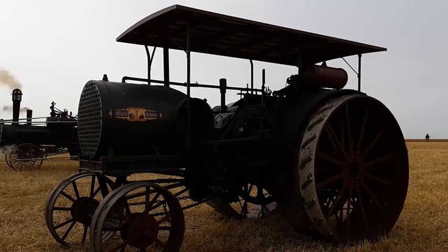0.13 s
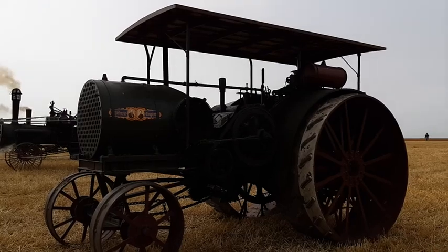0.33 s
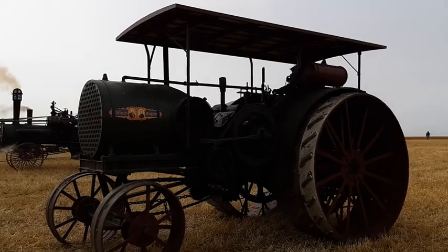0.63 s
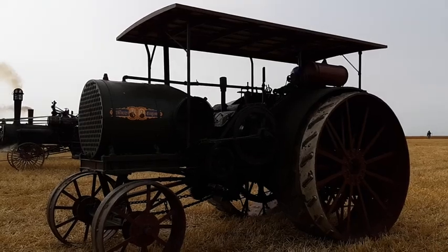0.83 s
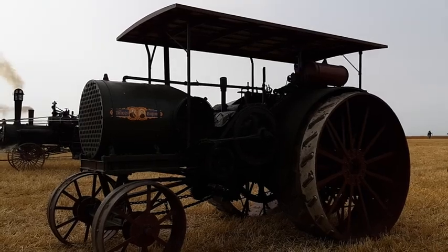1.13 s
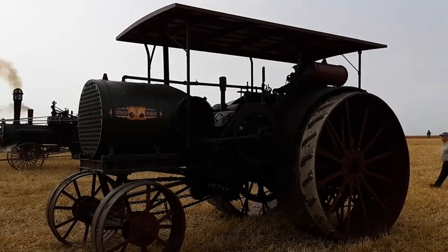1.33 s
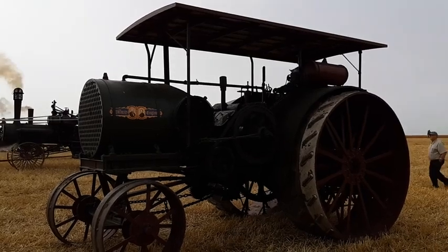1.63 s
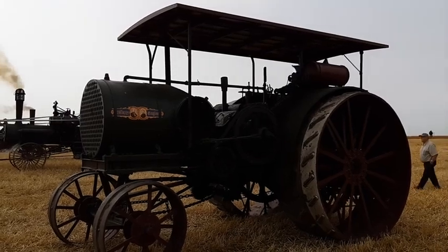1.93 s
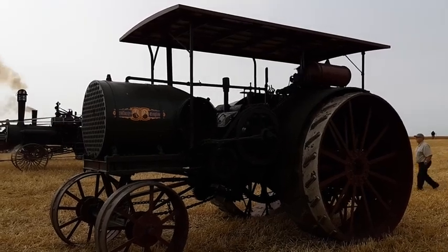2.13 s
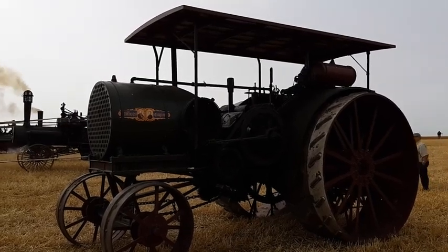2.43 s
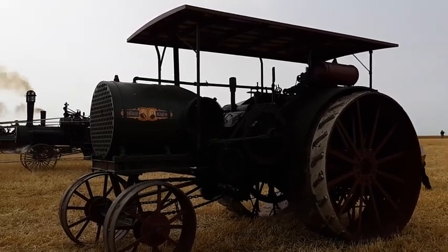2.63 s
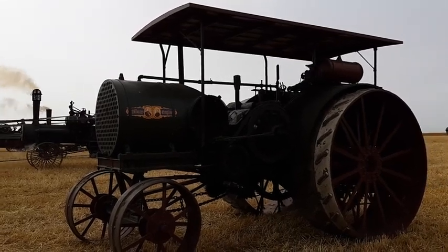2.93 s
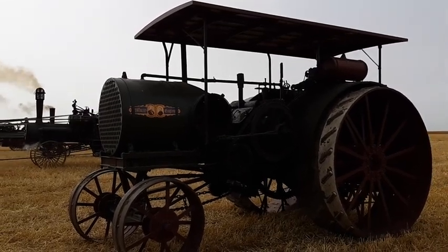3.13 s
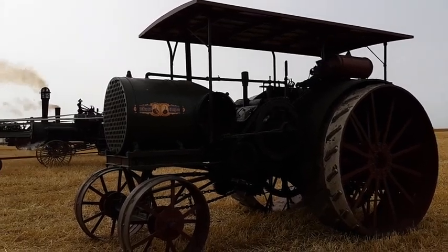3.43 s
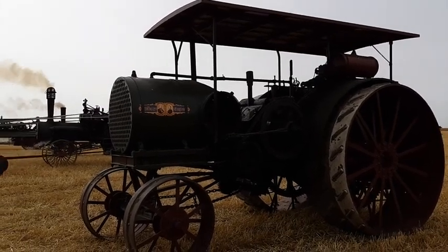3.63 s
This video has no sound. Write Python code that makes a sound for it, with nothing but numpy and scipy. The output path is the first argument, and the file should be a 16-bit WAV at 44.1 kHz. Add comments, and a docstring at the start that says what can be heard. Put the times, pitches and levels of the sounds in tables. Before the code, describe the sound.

An old tractor or steam engine chuffs rapidly and evenly over rushing, whining machinery, with loose metal rattling; a low second-engine drone fades early. Open stubble field, close stereo microphone beside the machine.

```python
"""A stubble field with old farm machinery at work, heard from beside a parked tractor.
Shaped noise makes the rush and roar of belt-driven machinery; a fast shaft whines in steady tones.
A second engine drones in low tones; its bass and a thin, throbbing hiss fall away after about a second.
Bursts of noise with quick decays make the rattle and clatter of loose parts.
A steam engine chuffs fifteen times a second: blasts of noise, each with a soft tail and an echo."""
import sys
import numpy as np
from scipy import signal
from scipy.fft import rfft, irfft
from scipy.io import wavfile

SR = 44100
rng = np.random.default_rng(int(sys.argv[2]) if len(sys.argv) > 2 else 0)


def wrap_up_sound(samples):
    """Save the sound to the file named by the first command line argument, as 16-bit audio."""
    columns = np.atleast_2d(samples).T
    # keep every value between -1 and 1, then stretch to whole-number steps
    tamed = np.clip(columns, -1, 1)
    steps = np.round(tamed * 32767).astype(np.int16)
    wavfile.write(sys.argv[1], SR, steps)


N = 167580  # length [samples]


def gain(db):
    """Turns decibels into a plain multiplier."""
    return 10 ** (np.asarray(db) / 20)


def evened(x):
    """Scales a sound to an average strength (rms) of one."""
    return x / np.sqrt(np.mean(x ** 2) + 1e-20)


def read_curve(points, hz):
    """Reads a curve between its points, with pitch spaced as the ear hears it (logarithmic)."""
    f, value = np.transpose(points)
    return np.interp(np.log(hz + 1), np.log(f + 1), value)


def clock():
    """Gives the time of each sample in seconds."""
    return np.arange(N) / SR


def level(points):
    """Turns a level curve in dB over time into a multiplier for each sample."""
    return gain(np.interp(clock(), *np.transpose(points)))


def wander(rate_hz):
    """Drifts at random, with changes faster than rate_hz smoothed away; rms of one."""
    hz = np.fft.rfftfreq(N, 1 / SR)
    smoothed = rfft(rng.standard_normal(N)) / (1 + (hz / rate_hz) ** 4)
    return evened(irfft(smoothed, N))


# Which side each pitch of the noise leans to: (frequency [Hz], left minus right [dB])
SIDE_LEAN = [(100, -0.5), (600, -0.1), (1200, -0.2), (2200, 2), (4500, 1.1), (8000, -1.3), (14000, -2)]


def stereo_noise(colour, likeness):
    """Makes noise with a chosen colour; the more alike left and right, the narrower it sounds."""
    hz = np.fft.rfftfreq(N, 1 / SR)
    a, b = rfft(rng.standard_normal((2, N)))
    same = np.clip(read_curve(likeness, hz), -1, 1)
    lean = gain(read_curve(SIDE_LEAN, hz) / 2)  # half the difference for each side
    mid, side = a * np.sqrt(1 + same), b * np.sqrt(1 - same)
    both = np.array([(mid + side) * lean, (mid - side) / lean])
    return evened(irfft(both * gain(read_curve(colour, hz)), N))


def patchy(x, depth_db, width_hz, length_s):
    """Makes random patches of pitch and time louder or softer, so the colour keeps shifting."""
    z = signal.stft(x, nperseg=512, noverlap=384)[2]
    across = np.fft.fftfreq(z.shape[1], SR / 512)[:, None]
    along = np.fft.fftfreq(z.shape[2], 128 / SR)
    blur = np.exp(-(across * width_hz) ** 2 - (along * length_s) ** 2)
    # one field serves both sides
    field = np.fft.ifft2(np.fft.fft2(rng.standard_normal(z.shape[1:])) * blur).real
    shifted = z * gain(depth_db * evened(field))
    return evened(signal.istft(shifted, nperseg=512, noverlap=384)[1][:, :N])


def blows(rows, decay_s):
    """Makes the loudness of sudden blows that die away; where they overlap, their powers add."""
    power = np.zeros(N)
    for s, db in rows:
        power[int(np.clip(s * SR, 0, N - 1))] += gain(db) ** 2
    kept = np.exp(-2 / (decay_s * SR))  # share of the power left after one sample
    return np.sqrt(signal.lfilter([1], [1, -kept], power + 1e-20))


WAVER_TURNS, WAVER_DB = 0.034, 1.5  # rms waver of a tone's phase [turns] and level [dB]


def tone(hz, db):
    """Makes one pure tone that wavers slightly in phase and level."""
    turns = hz * clock() + WAVER_TURNS * wander(rate_hz=1.6) + rng.random()
    loudness = gain(db + WAVER_DB * wander(rate_hz=1.7))
    return np.sqrt(2) * loudness * np.sin(2 * np.pi * turns)


# Colour of the rushing machinery: (frequency [Hz], relative level per hertz [dB])
RUSH_COLOUR = [(20, -28), (45, -26), (70, -8.5), (130, -9), (190, -3), (280, -0.5), (350, -3), (480, -10.5),
               (620, -3), (740, -5), (940, -10), (1250, -6.5), (2130, -7.5), (2450, -16.5), (3600, -15.5),
               (5050, -14.5), (5700, -20.5), (6500, -30), (8000, -31), (9300, -26), (11200, -34.5),
               (12800, -30), (15800, -42)]
# Loudness of the rush: (time [s], level [dB])
RUSH_LEVEL = [(.2, -22), (.5, -20), (1.15, -19.5), (1.45, -21), (1.7, -22.5), (2.1, -21), (2.35, -21),
              (2.6, -21.5), (2.95, -21.5), (3.25, -21.5), (3.55, -20), (3.8, -21.5)]
# How alike left and right are in wide sounds: (frequency [Hz], likeness [0 to 1])
WIDE_LIKENESS = [(50, 0.93), (350, 0.92), (680, .92), (1100, 0.34), (2100, 0.46), (3500, 0.32),
                 (5300, 0.19), (7000, .04), (15000, .02)]
# Colour of the hollow machine housings: (frequency [Hz], relative level per hertz [dB])
ROAR_COLOUR = [(100, -30), (220, -4.5), (300, 4.5), (390, -1), (480, -8.5), (610, -3.5), (680, 2.5),
               (770, -3), (950, -7), (1170, -8.5), (1500, -15), (3000, -37.5)]
# Loudness of the housings' roar: (time [s], level [dB])
ROAR_LEVEL = [(.2, -29.5), (1.2, -37), (1.6, -26.5), (2.3, -29), (2.9, -24), (3.4, -25.5), (3.8, -29)]
# Whine of a fast shaft: (frequency [Hz], level [dB])
SHAFT_WHINE = [(113, -46.5), (226.1, -35), (339.1, -37)]


def machinery():
    """Moving parts give a fluttering rush, hollow housings roar, and a turning shaft whines."""
    flutter = gain(.5 * wander(rate_hz=18))
    rush = patchy(stereo_noise(RUSH_COLOUR, WIDE_LIKENESS), depth_db=1.53, width_hz=460, length_s=0.04)
    roar = level(ROAR_LEVEL) * stereo_noise(ROAR_COLOUR, WIDE_LIKENESS)
    whine = sum(tone(hz, db) for hz, db in SHAFT_WHINE)
    return level(RUSH_LEVEL) * flutter * rush + roar + whine


FIRING_HZ = 18.84  # firing rate of the second engine
RUMBLE_DB, HISS_THROB = -26, 0.23  # rumble before the bass curve [dB]; depth of the throb [share]
# Drone before the bass curve: (multiple of the firing rate, level [dB])
DRONE = [(3, -42), (4, -31.5), (5, -35.5), (6, -36.5), (9, -32.5), (10, -34), (12, -31.5)]
# Loudness curve shared by drone and rumble: (time [s], level [dB])
BASS_LEVEL = [(.2, -5), (.48, 0), (.75, -1), (1.08, -0.5), (1.32, -3.5), (1.5, -6), (1.75, -31), (3.8, -17)]
# Colour of the engine's rumble: (frequency [Hz], relative level per hertz [dB])
RUMBLE_COLOUR = [(25, -26), (48, -12), (70, 4), (130, 4), (180, -1.5), (255, 2), (340, -18), (550, -20),
                 (1500, -34)]
# Colour of the thin hiss: (frequency [Hz], relative level per hertz [dB])
HISS_COLOUR = [(1000, -3), (2000, 6), (2700, 6.5), (4500, -2), (4920, 12.5), (5400, -13), (6400, 1),
               (7000, -3), (7800, -19), (9500, -10.5), (13000, -8.5), (16000, -27)]
# Loudness of the hiss: (time [s], level [dB])
HISS_LEVEL = [(.2, -36), (.4, -32), (.55, -31), (.68, -28), (.88, -31.5), (1.18, -31), (1.4, -34),
              (1.65, -52), (3.8, -52)]


def second_engine():
    """Regular firing makes tones at multiples of its rate, over rumble and a throbbing hiss."""
    drone = sum(tone(round(k) * FIRING_HZ, db) for k, db in DRONE)
    rumble = gain(RUMBLE_DB) * stereo_noise(RUMBLE_COLOUR, WIDE_LIKENESS)
    throb = 1 + HISS_THROB * np.cos(2 * np.pi * FIRING_HZ * clock())
    hiss = patchy(stereo_noise(HISS_COLOUR, WIDE_LIKENESS), depth_db=2.5, width_hz=760, length_s=.04)
    return level(BASS_LEVEL) * (drone + rumble) + level(HISS_LEVEL) * throb * hiss


# clicks a second, level of each [dB], time to die away [s]
CLICKS_PER_S, CLICK_DB, CLICK_DECAY_S = 160, -32, 0.0012
SHAKE_DECAY_S = 0.024
# Colour of clicking chains and gears: (frequency [Hz], relative level per hertz [dB])
CLICK_COLOUR = [(800, -18), (2000, 4), (2600, 13), (5200, -13), (6500, -20), (9500, -23), (16000, -22)]
# Short shakes of loose ironwork: (time [s], level [dB])
SHAKES = [(.295, -24.5), (.515, -27), (1.8, -28), (2.65, -27), (3.51, -24), (3.61, -28), (3.722, -24.5)]
# Colour of the shaken ironwork: (frequency [Hz], relative level per hertz [dB])
SHAKE_COLOUR = [(1500, -25), (3000, -9), (4400, -4), (5100, 1), (5700, -4), (6700, -16), (9500, -23),
                (16000, -28)]


def rattle():
    """Chains and gears click densely at random; now and then loose ironwork shakes."""
    starts = np.flatnonzero(rng.random(N) < CLICKS_PER_S / SR)
    clicks = [(i / SR, CLICK_DB) for i in starts]
    fine = blows(clicks, CLICK_DECAY_S) * stereo_noise(CLICK_COLOUR, WIDE_LIKENESS)
    shaken = blows(SHAKES, SHAKE_DECAY_S) * stereo_noise(SHAKE_COLOUR, WIDE_LIKENESS)
    return fine + shaken


# random knocks a second, their middle level [dB] and their spread [dB]
KNOCKS_PER_S, KNOCK_DB, KNOCK_SPREAD_DB = 70, -25.5, -1
KNOCK_DECAY_S, TICK_DECAY_S = 0.0044, 0.0081
# Colour of the dull knocks: (frequency [Hz], relative level per hertz [dB])
KNOCK_COLOUR = [(100, -25), (300, -7), (480, -4), (700, 5.5), (1000, -0.5), (2000, -16), (3000, -27),
                (12000, -55)]
# The clearest knocks: (time [s], level [dB])
CLEAR_KNOCKS = [(1.252, -11), (1.458, -18), (2.082, -20), (3.505, -19), (3.602, -17)]
# Small bright ticks of metal: (time [s], level [dB])
TICKS = [(2.033, -32), (3.52, -37)]
# Colour of the ticks: (frequency [Hz], relative level per hertz [dB])
TICK_COLOUR = [(3000, -25), (7500, -19), (9600, 5), (11500, -8), (16000, -16)]
# How alike left and right are in narrow sounds: (frequency [Hz], likeness [0 to 1])
NARROW_LIKENESS = [(300, 0.99), (2000, 0.97), (5000, 0.96), (12000, .4)]


def clatter():
    """Loose parts knock at random, a few clearer; now and then metal ticks."""
    chance, size = rng.random(N), rng.standard_normal(N)
    # the spread is negative, so the cap of 2 limits how soft a knock can be
    loose = [(i / SR, KNOCK_DB + KNOCK_SPREAD_DB * min(size[i], 2))
             for i in np.flatnonzero(chance < KNOCKS_PER_S / SR)]
    knocks = blows(loose + list(CLEAR_KNOCKS), KNOCK_DECAY_S)
    ticks = blows(TICKS, TICK_DECAY_S) * stereo_noise(TICK_COLOUR, WIDE_LIKENESS)
    return knocks * stereo_noise(KNOCK_COLOUR, NARROW_LIKENESS) + ticks


FIRST_BEAT_S, BEAT_S = .2475, .06666  # first exhaust beat and the time between beats
CHUFF_RISE_S, CHUFF_HOLD_S, CHUFF_DECAY_S = 0.0033, 0.0055, 0.014
CHUFF_TAIL, CHUFF_TAIL_S = .35, 0.042  # strength beside the blast, time to die away
CHUFF_SCATTER_DB = 0.9  # random spread from beat to beat
RING_DECAY_S = 0.016
ECHO_S, ECHO_SHARE = .0072, 0.32  # the ironwork throws each chuff back
# Four exhaust beats to a turn of the crank: (delay [s], relative level [dB])
STROKES = [(0.0012, 1), (0.00017, 1), (0.00014, 0), (0.0016, 0.5)]
# Beats that bark out harder: (time [s], extra level [dB])
HARD_BEATS = [(.385, 4), (.45, 7.5), (1.18, 6), (1.45, 6), (1.72, 3), (1.785, 2), (1.985, 5.5), (2.05, 3.5),
              (2.32, 5.5), (2.72, 3.5), (2.85, 3.5), (3.12, 3), (3.25, 3.5), (3.32, 3), (3.45, 2),
              (3.515, 1), (3.585, 3.5)]
# Colour of the exhaust: (frequency [Hz], relative level per hertz [dB])
CHUFF_COLOUR = [(150, -15), (400, -4.5), (650, -0.5), (930, -4), (1215, 3.5), (1430, -5.5), (1900, 3.5),
                (2200, -4), (2450, -17.5), (5000, -12.5), (6500, -28), (9500, -29), (16000, -33)]
# Loudness of the exhaust: (time [s], level [dB])
CHUFF_LEVEL = [(.2, -22.5), (1.1, -24.5), (1.6, -22), (2.4, -23), (3.1, -21.5), (3.8, -23)]
# Beats that set the chimney ringing: (time [s], level [dB])
RINGS = [(.452, -21), (1.786, -20), (3.583, -14)]
# Colour of the ringing chimney: (frequency [Hz], relative level per hertz [dB])
CHIMNEY_COLOUR = [(700, -37), (1030, -9), (1190, 4), (1280, -5.5), (1450, -20), (2500, -51)]


def steam_engine():
    """Each exhaust beat is a short blast up the chimney with a softer tail, then an echo."""
    t, power = clock(), np.zeros(N)
    for k, beat in enumerate(np.arange(FIRST_BEAT_S, N / SR, BEAT_S)):
        delay, db = STROKES[k % len(STROKES)]
        db += sum(extra for s, extra in HARD_BEATS if abs(s - beat) < BEAT_S / 2)
        db += CHUFF_SCATTER_DB * rng.standard_normal()
        span = slice(int(beat * SR), int(beat * SR) + SR // 8)
        age = np.maximum(t[span] - beat - delay, 0)
        rise = np.minimum(age / CHUFF_RISE_S, 1)
        blast = np.exp(-np.maximum(age - CHUFF_HOLD_S, 0) / CHUFF_DECAY_S)
        tail = CHUFF_TAIL * np.exp(-age / CHUFF_TAIL_S)
        power[span] += (gain(db) * rise) ** 2 * (blast ** 2 + tail ** 2)
    steam = patchy(stereo_noise(CHUFF_COLOUR, NARROW_LIKENESS), depth_db=1.95, width_hz=140, length_s=0.038)
    ringing = blows(RINGS, RING_DECAY_S) * stereo_noise(CHIMNEY_COLOUR, NARROW_LIKENESS)
    direct = level(CHUFF_LEVEL) * np.sqrt(power) * steam + ringing
    return direct + ECHO_SHARE * np.roll(direct, round(ECHO_S * SR), axis=1)


ENGINE_LEFT_DB = 1.8  # how much the left is raised over the right for the second engine


def scene():
    """Adds up all the machines in the field; the second engine stands a little to the left."""
    left = gain(ENGINE_LEFT_DB * np.array([[.5], [-.5]]))
    return machinery() + left * second_engine() + rattle() + clatter() + steam_engine()


OPEN_S, OPEN_RISE_S = 0.1967, 0.0022  # silence before the sound cuts in, and its quick rise
EDGE_HZ = 15800  # higher pitches are cut away


def record(dry):
    """Cuts the sound in after a short silence, then filters away the highest pitches."""
    opened = dry * np.clip((clock() - OPEN_S) / OPEN_RISE_S, 0, 1)
    lowpass = signal.firwin(511, EDGE_HZ, window=("kaiser", 9), fs=SR)
    return signal.oaconvolve(opened, lowpass[None], "same")


dry = scene()
out = record(dry)
wrap_up_sound(out)
```